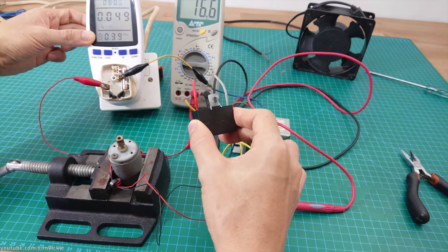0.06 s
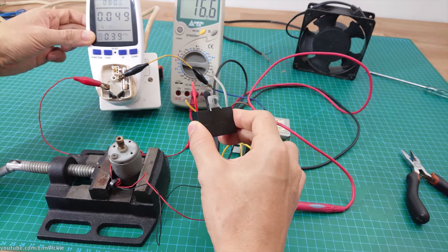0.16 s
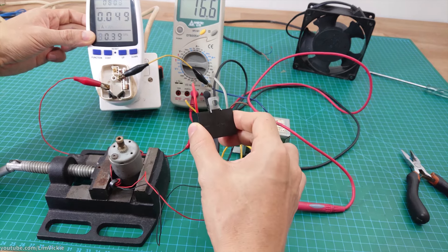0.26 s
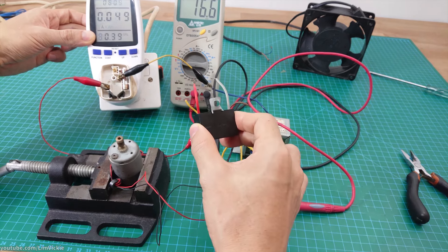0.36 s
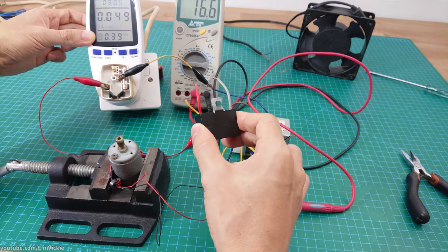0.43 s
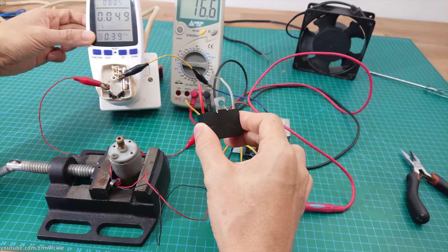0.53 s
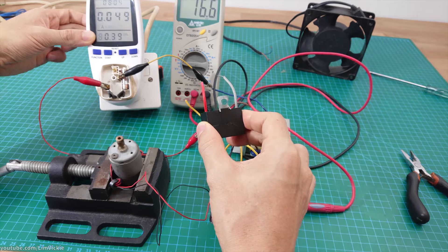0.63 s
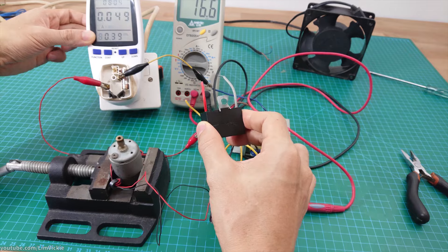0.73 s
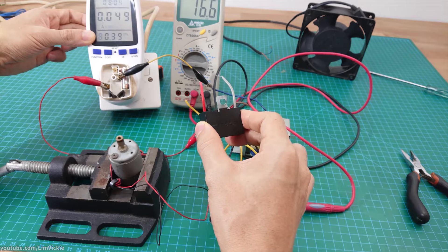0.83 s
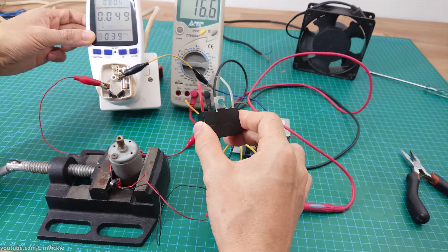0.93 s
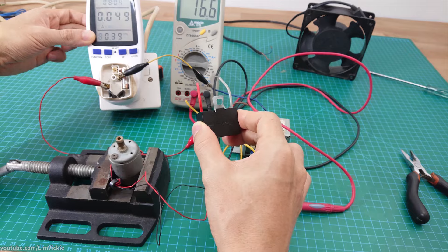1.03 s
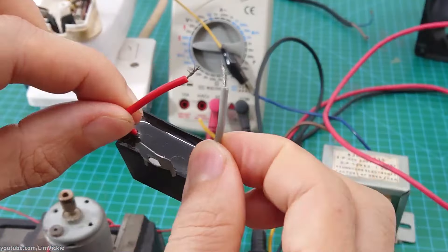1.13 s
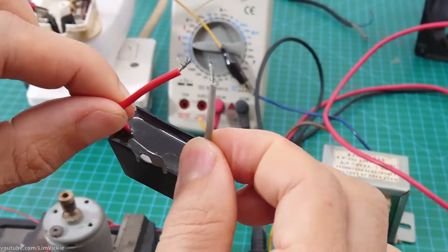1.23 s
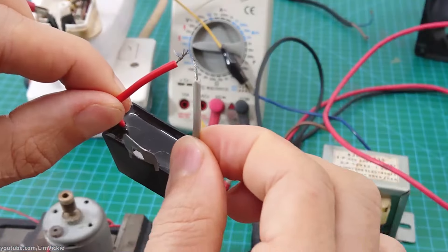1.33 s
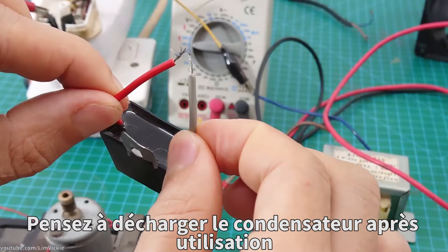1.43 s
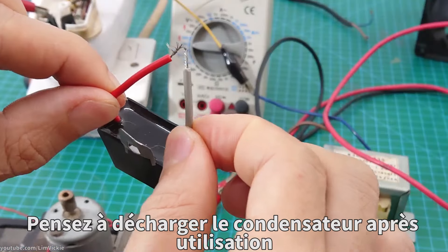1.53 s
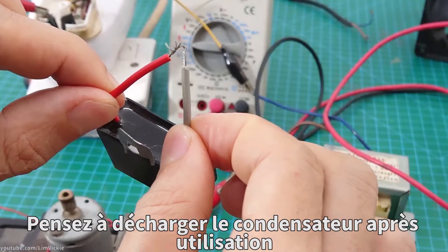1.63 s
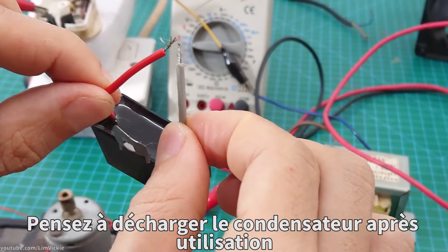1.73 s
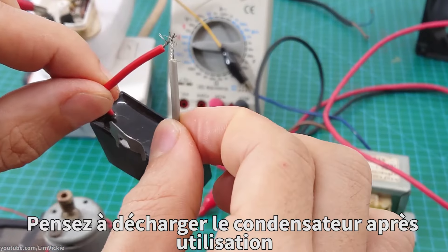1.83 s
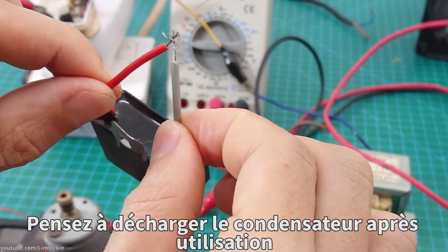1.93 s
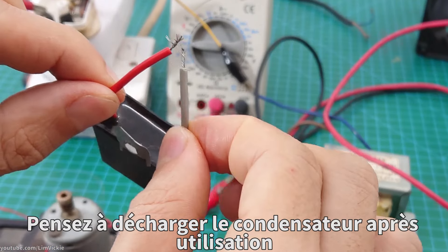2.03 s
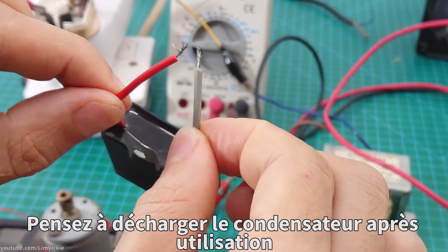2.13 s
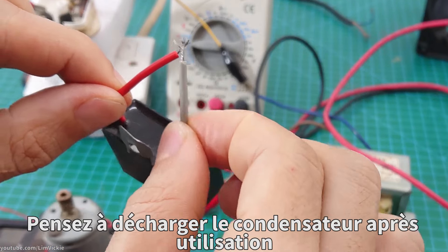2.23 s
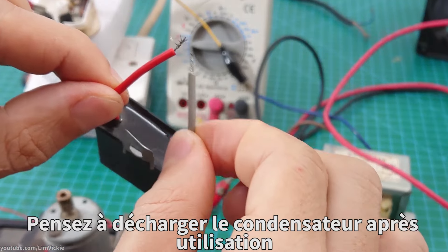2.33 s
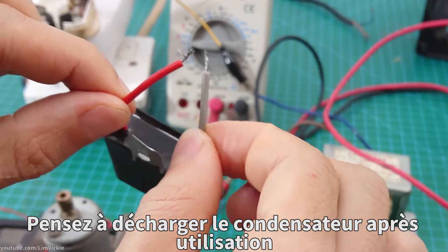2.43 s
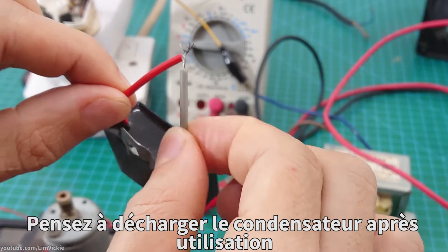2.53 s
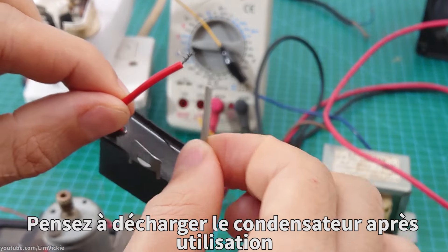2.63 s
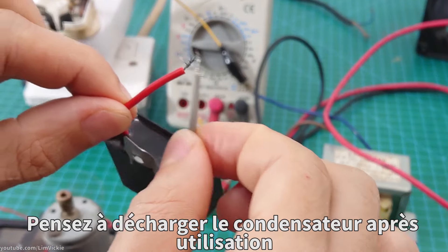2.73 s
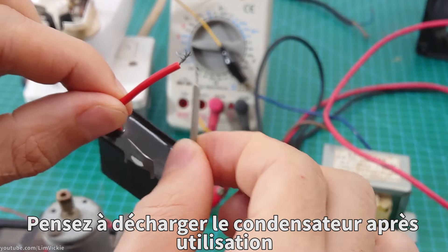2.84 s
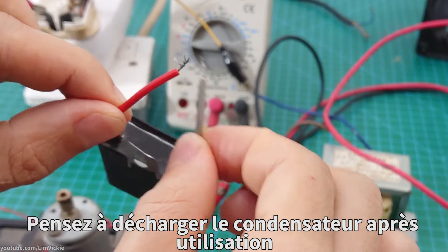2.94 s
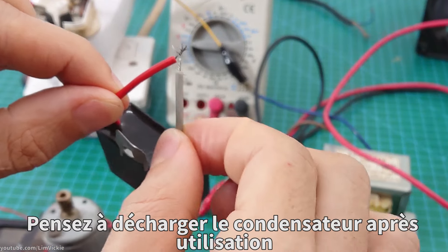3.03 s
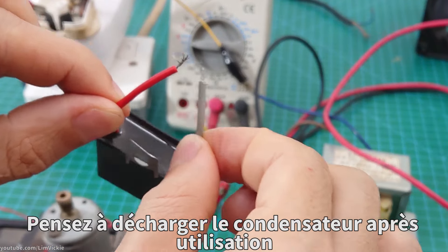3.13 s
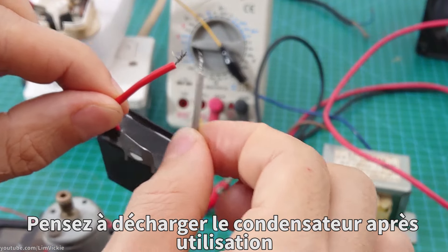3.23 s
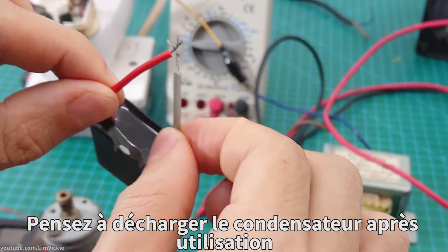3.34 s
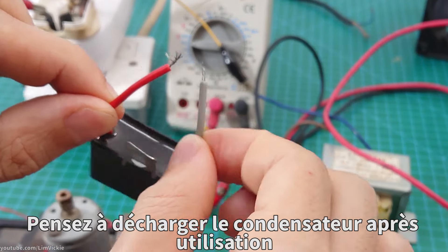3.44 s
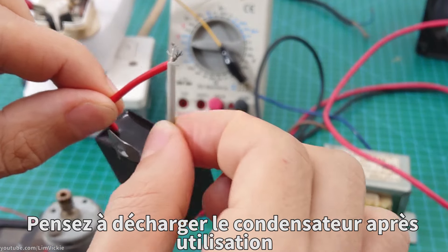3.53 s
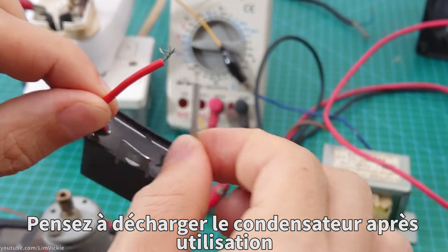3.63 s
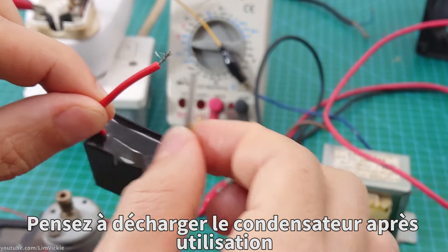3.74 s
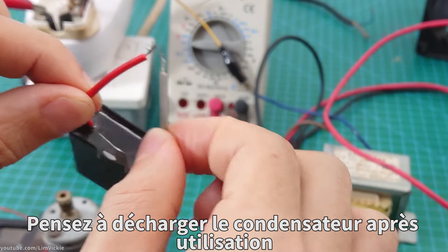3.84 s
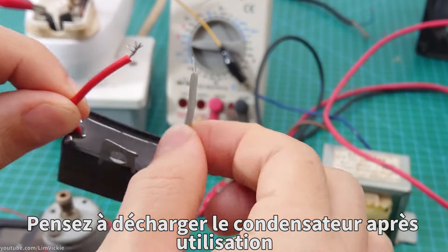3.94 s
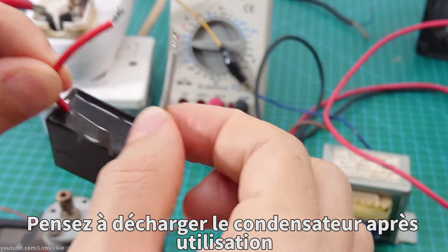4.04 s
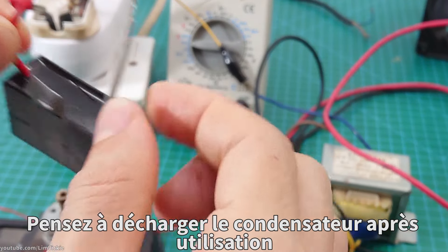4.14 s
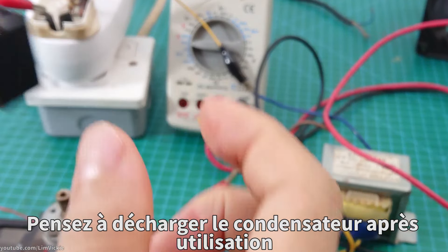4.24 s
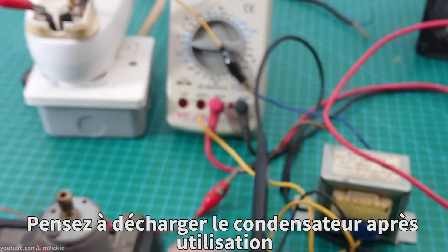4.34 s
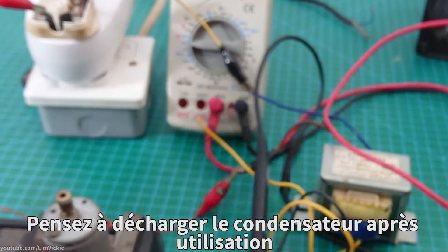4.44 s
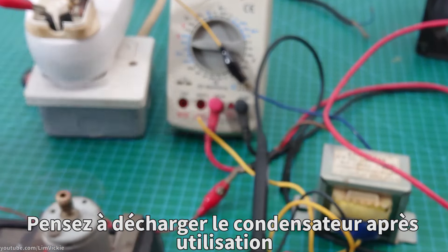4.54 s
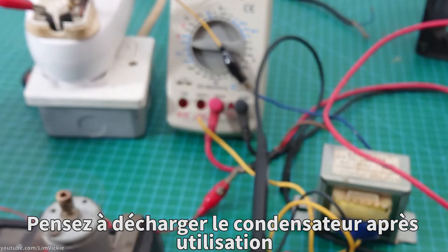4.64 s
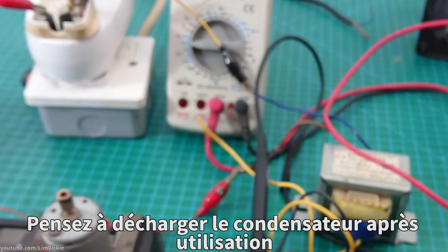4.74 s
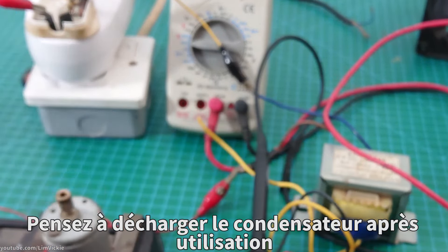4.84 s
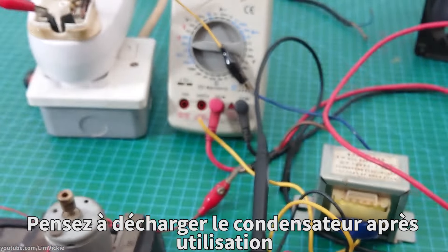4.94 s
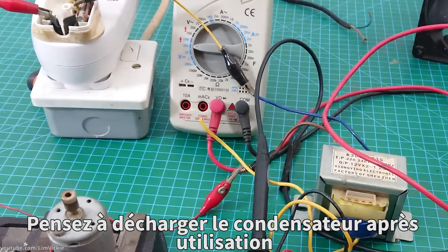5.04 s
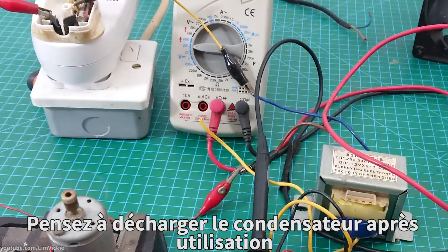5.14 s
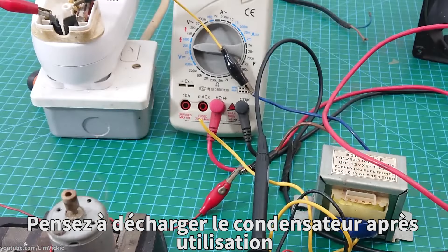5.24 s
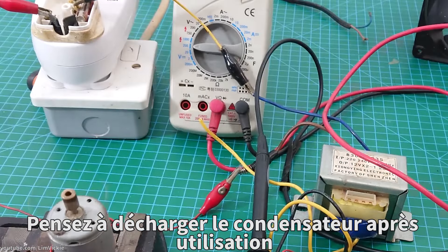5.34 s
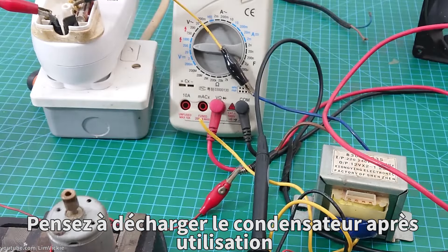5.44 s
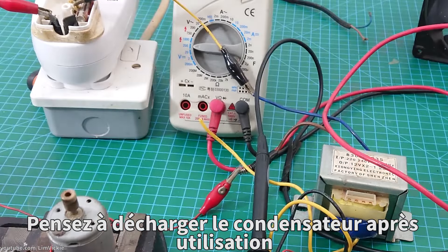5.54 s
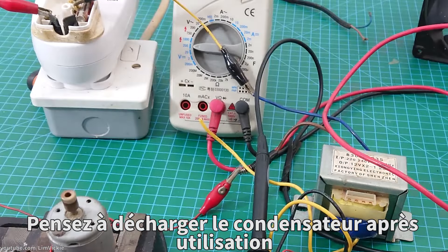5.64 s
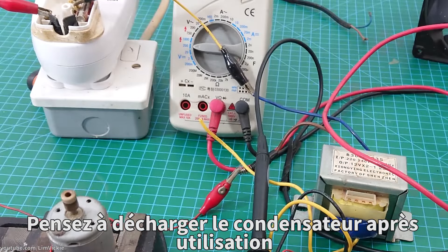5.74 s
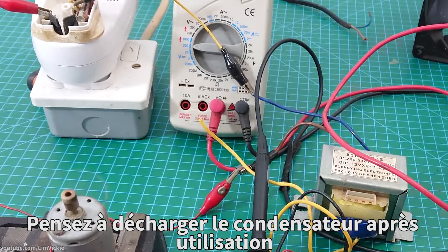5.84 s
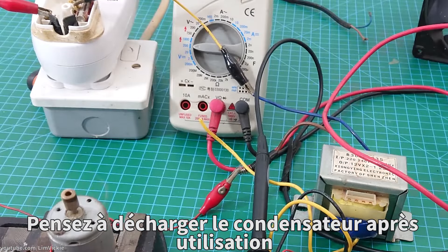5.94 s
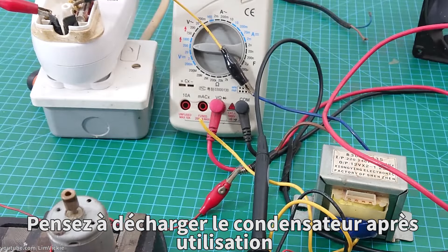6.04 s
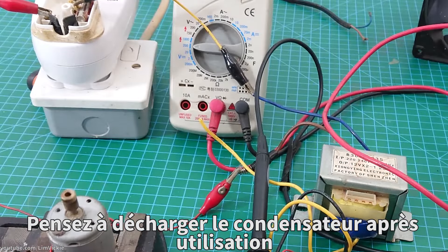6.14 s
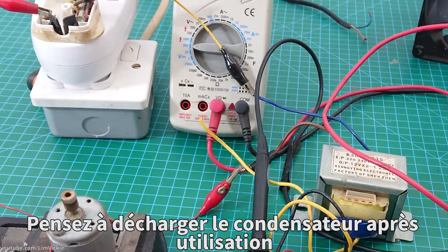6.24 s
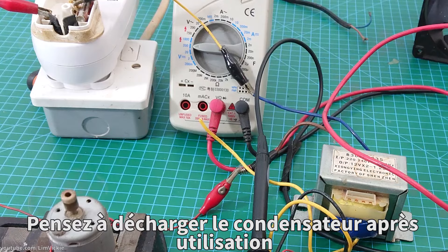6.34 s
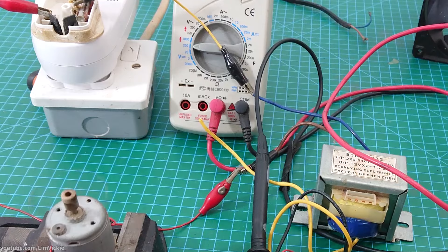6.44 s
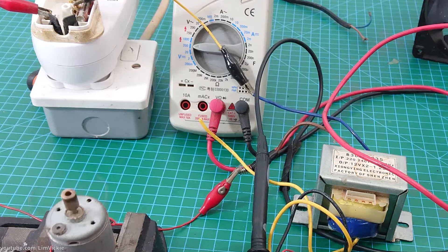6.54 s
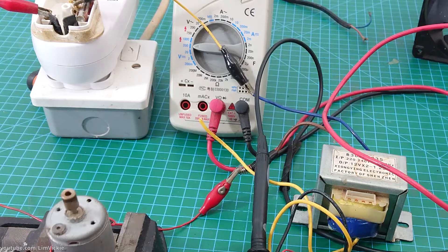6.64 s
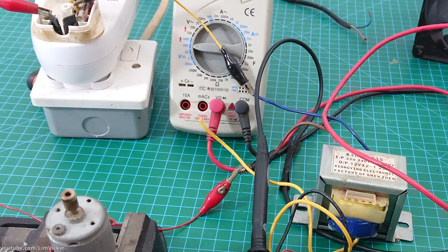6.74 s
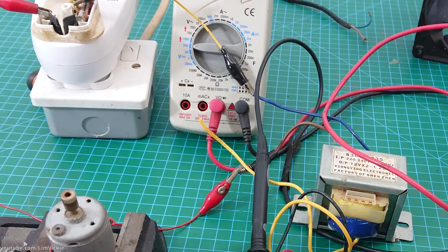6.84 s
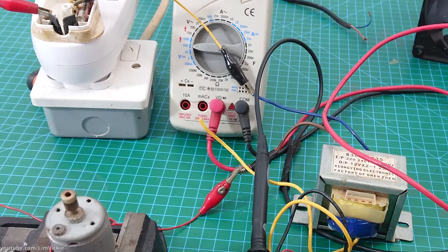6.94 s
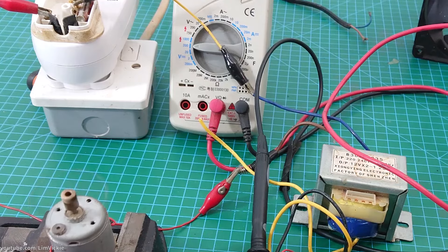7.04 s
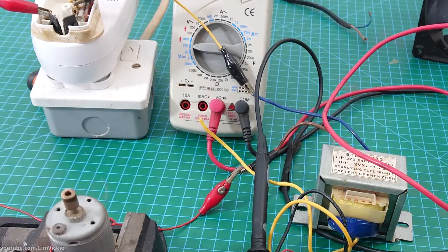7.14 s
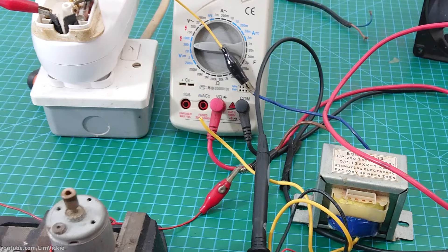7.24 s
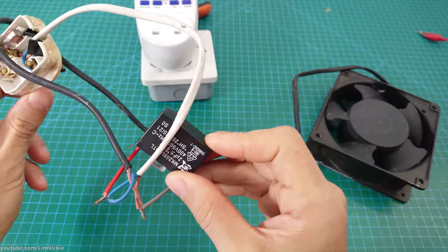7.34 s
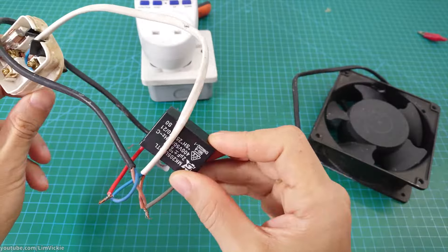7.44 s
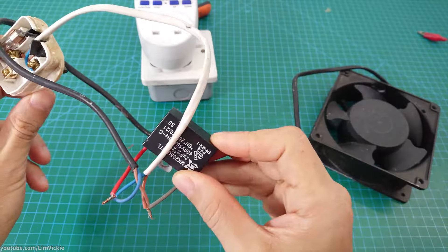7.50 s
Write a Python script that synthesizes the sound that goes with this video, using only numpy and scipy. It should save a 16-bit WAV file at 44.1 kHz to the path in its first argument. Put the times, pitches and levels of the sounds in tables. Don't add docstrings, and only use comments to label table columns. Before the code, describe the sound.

Indoors, a little motor buzzes unbroken, low drone mostly left with metallic ticking on top. About two seconds in, an explosive spark crack jolts the microphone and pushes the motor down for a moment while hissy reverberation fades. The buzz recovers and gets slightly brighter, with a distant double clatter and a faint high squeal behind it. It stops abruptly; after a blink of silence, soft room air and a thin bright brush of wires.

```python
import sys
import numpy as np
from scipy import signal
from scipy.fft import rfft, irfft
from scipy.io import wavfile

SR = 44100
rng = np.random.default_rng(int(sys.argv[2]) if len(sys.argv) > 2 else 0)


def dump(signal):
    limited = np.clip(np.atleast_2d(signal).T, -1, 1)
    pcm = np.round(limited * 32767).astype(np.int16)
    wavfile.write(sys.argv[1], SR, pcm)


def magnitude_from_level(level_db):
    exponent = np.asarray(level_db, float) / 20
    return 10 ** exponent


N = 333881


def at(s):
    return np.round(np.asarray(s) * SR).astype(int)


def ramp(start_s, length_s):
    return np.clip((np.arange(N) / SR - start_s) / length_s, 0, 1)


def drift(rate):
    knots = rng.standard_normal(400)
    return np.interp(np.arange(N) / SR * rate, np.arange(400), knots) * 1.45


def ring(clicks, hz, t60):
    r = magnitude_from_level(-60 / (t60 * SR))
    w = 2 * np.pi * hz / SR
    return signal.lfilter([0, np.sin(w)], [1, -2 * r * np.cos(w), r * r], clicks + 1e-18)


def coloured(rows, size):
    hz, *sides = np.transpose(rows)
    bins = np.log(np.fft.rfftfreq(size, 1 / SR) + 1)
    gains = [magnitude_from_level(np.interp(bins, np.log(hz), db, left=-130)) for db in sides]
    return irfft(rfft(rng.standard_normal((2, size))) * gains, size) * np.sqrt(SR / 2)


# [up to f/Hz, far level/dB, level behind the hands/dB, level once the hands are gone/dB]
MOTOR_REACH = [(1800, -6.5, -1, -0.5), (3300, 1.5, 1, 2), (5200, 1.5, 1, 1.5), (7000, 7.5, -0.5, 3.5),
               (20000, 6, 2, 3)]
CLOSER_S = 1.2
HANDS_LEAVE_S, CLEARING_S = 4.27, 1.7
ARM_SHADOW_DB = -1.5


def reach_db(hz):
    tops = [row[0] for row in MOTOR_REACH]
    _, far_db, shaded_db, clear_db = MOTOR_REACH[np.searchsorted(tops, hz)]
    clear = ramp(HANDS_LEAVE_S, CLEARING_S)
    arm_db = ARM_SHADOW_DB * np.sin(np.pi * clear) * (hz < tops[0])
    close_db = shaded_db + (clear_db - shaded_db) * clear + arm_db
    return np.where(np.arange(N) / SR < CLOSER_S, far_db, close_db)


TURNS_HZ = 41.625
# [t/s, lateness/turns]
MOTOR_LATE = [(0, .075), (1.195, 0.093), (1.2, .29), (2.65, .275), (4.4, .405), (5.5, 0.38), (7.3, .345)]
# [multiple, left level/dB, right level/dB]
MOTOR_DRONE = [(2, -53, -81), (3, -80, -79), (4, -51, -82), (5, -56, -83.5), (6, -63, -100), (7, -67, -72),
               (8, -57, -88), (9, -56, -91), (11, -65.5, -91), (12, -70, -78), (13, -64, -87),
               (14, -70.5, -86), (15, -71.5, -96), (16, -67, -98), (19, -76, -82), (20, -76, -77.5),
               (22, -70, -83), (33, -62.5, -72), (35, -63.5, -83.5), (36, -62.5, -84), (39, -80.5, -89),
               (40, -64.5, -99), (58, -72, -74)]
# [place/turns, f/Hz, t60/s, left peak level/dB, right peak level/dB]
MOTOR_CONTACTS = [(.52, 1091, 0.032, -39.5, -48.5), (.53, 3040, 0.0044, -42.5, -42),
                  (0.66, 5900, 0.016, -59.5, -57), (.53, 3700, 0.0045, -53, -55),
                  (.83, 1236, 0.029, -45.5, -62), (.82, 2690, 0.006, -44, -62),
                  (.12, 1063, 0.0074, -43, -51), (.55, 2040, 0.0097, -47, -65),
                  (0, 3800, 0.018, -46.5, -56), (0.033, 5800, 0.012, -48, -93),
                  (0.16, 8470, 0.0074, -54, -85), (0.022, 10150, 0.018, -60.5, -75.5),
                  (0, 12300, .008, -63, -66), (0.25, 12000, .004, -53, -65), (0.02, 15000, .006, -58, -68),
                  (.14, 4450, 0.0054, -43.5, -60.5), (0.073, 4240, 0.0057, -57, -52),
                  (0.053, 9200, 0.0055, -53, -74), (0.18, 11000, 0.0042, -58, -64.5)]


def motor(swell_db=1.5, wander_db=1.3, hit_db=1.1, jitter_s=6e-6, room_db=-11, room_t60=.2):
    t = np.arange(N) / SR
    turns = TURNS_HZ * t - np.interp(t, *np.transpose(MOTOR_LATE))
    drone, knocks = np.zeros((2, N)), np.zeros((2, N))
    for k, *db in MOTOR_DRONE:
        tone = np.sin(2 * np.pi * (np.round(k) * turns + rng.random()))
        drone += np.outer(magnitude_from_level(db), np.sqrt(2) * tone * magnitude_from_level(swell_db * drift(2.56)))
    for turn, hz, t60, left_db, right_db in MOTOR_CONTACTS:
        chance = rng.standard_normal((330, 2))
        s = np.interp(np.arange(330) + turn, np.maximum.accumulate(turns), t) + jitter_s * chance[:, 0]
        clicks = np.zeros(N)
        clicks[np.clip(at(s), 0, N - 1)] = magnitude_from_level(hit_db * chance[:, 1])
        rung = ring(clicks * magnitude_from_level(reach_db(hz) + wander_db * drift(1.54)), hz, t60)
        knocks += [magnitude_from_level(left_db) * rung, magnitude_from_level(right_db) * np.roll(rung, 8)]
    echo_t = t[:9000]
    echoes = rng.standard_normal((2, 9000)) * magnitude_from_level(-60 * echo_t / room_t60) * (echo_t > .002)
    echoes *= magnitude_from_level(room_db) / np.linalg.norm(echoes, axis=1, keepdims=True)
    return drone + knocks + signal.fftconvolve(knocks, echoes, axes=1)[:, :N]


# [f/Hz, left level/dB per Hz, right level/dB per Hz]
WORKSHOP_AIR = [(32.9, -94, -94), (55, -67, -78), (101, -80, -82.5), (171, -79.5, -88), (250, -81, -103),
                (408, -77.5, -102.5), (664, -85.5, -101.5), (1620, -87.5, -93.5), (4300, -99, -96.5),
                (6050, -95, -100), (6970, -103, -112), (7500, -106, -121), (8700, -101, -110),
                (15500, -102, -112)]
# [f/Hz, width/Hz, left level/dB]
ROOM_MODES = [(60, 8, -62), (96, 4.6, -61), (123, 8, -56.5), (241.7, 7, -59.5), (289, 8.8, -75)]


def workshop_air(patchy_db=0.7):
    out = coloured(WORKSHOP_AIR, N) * magnitude_from_level(patchy_db * drift(9))
    for hz, width_hz, db in ROOM_MODES:
        hum = ring(rng.standard_normal(N), hz, 3.0 / width_hz)
        out[0] += magnitude_from_level(db) * hum / hum.std()
    return out


# [t/s, left height, right height, edge f/Hz, ringing]
MIC_JOLTS = [
    (2.06460, .83, .022, 4000, 1),
    (2.63452, -.138, 0, 2100, .72),
    (1.866, 0, .012, 150, .9),
    (1.8845, 0, -.013, 150, .9),
]
# [f/Hz, Q]
RUMBLE_FILTER = [(54, 1.66), (55.1, 1.04), (31, 1.18)]


def jolts():
    out = np.zeros((2, N))
    for s, left, right, edge_hz, ringing in MIC_JOLTS:
        step = signal.lfilter(*signal.bessel(2, edge_hz, fs=SR, norm="mag"), np.ones(9000))
        for hz, q in RUMBLE_FILTER:
            w = 2 * np.pi * hz
            step = signal.lfilter(*signal.bilinear([1, 0, 0], [1, w / (q * ringing), w * w], SR), step)
        out[:, at(s) + np.arange(9000)] += np.outer([left, right], step)
    return out


# [t/s, left peak level/dB, right peak level/dB]
SPARK_CLICKS = [(2.06452, -7, -40), (2.06457, -40, -11), (2.06485, -40, -15), (2.06548, -17, -25),
                (2.06582, -40, -23), (2.06703, -36, -22), (2.0687, -32, -24), (2.0710, -22, -23),
                (2.0723, -22, -26)]
CRACK_S = SPARK_CLICKS[0][0]
# [f/Hz, t60/s, left level/dB, right level/dB]
MIC_RESONANCES = [(6100, .0018, -11, -5), (11500, .0014, -12, -10), (14600, .0016, -4, -9),
                  (3300, .001, -9, -30), (4600, .0015, -14, -12)]


def spark(smear_db=-28, smear_t60=.0035):
    out = np.zeros((2, N))
    s, *db = np.transpose(SPARK_CLICKS)
    for hz, t60, *mode_db in MIC_RESONANCES:
        clicks = np.zeros((2, N))
        peak_db = np.array(db) + np.c_[mode_db] + rng.standard_normal((len(s), 2)).T
        clicks[:, at(s)] = magnitude_from_level(peak_db) * np.c_[[-1, 1]]
        clicks[0, at(s[0] + .002):] *= min(hz / 12000, 1) ** 2
        out += ring(clicks, hz, t60)
    out[1] = 1.25 * signal.lfilter(*signal.butter(2, 3200, "high", fs=SR), out[1])
    ahead = np.arange(200)
    smear = np.diff(rng.standard_normal((2, 201)))
    out[:, at(s[0]) - ahead] += smear * magnitude_from_level(smear_db - 60 * ahead / SR / smear_t60)
    return out


# [f/Hz, left level/dB per Hz, right level/dB per Hz, t60/s]
SPARK_TAIL = [(1200, -74.5, -101, 0.22), (2200, -80.5, -76, 0.56), (3600, -74.5, -77, 0.57),
              (5500, -76, -74.5, 0.53), (7000, -77, -87, 0.65), (7800, -82.5, -78, 0.45),
              (9300, -65.5, -80, 0.45), (11800, -69, -70, 0.44), (14000, -63, -73, 0.39),
              (15500, -67, -90, 0.53)]


def spark_tail(size=30000, early_db=3, early_t60=.07, late_db=-32):
    out, t, hz = np.zeros((2, N)), np.arange(size) / SR, np.fft.rfftfreq(size, 1 / SR)
    edges = [700] + [row[0] for row in SPARK_TAIL] + [17000]
    onset = np.clip(t / np.c_[[.007, .002]], 0, 1) ** np.c_[[2, 1]]
    early = magnitude_from_level(early_db - 60 * t / early_t60)
    for k, (_, left_db, right_db, t60) in enumerate(SPARK_TAIL):
        share = np.interp(hz, edges[k:k + 3], [0, 1, 0])
        gains = np.outer(magnitude_from_level([left_db, right_db]), np.sqrt(share * SR / 2))
        band = irfft(rfft(rng.standard_normal((2, size))) * gains, size)
        decay = magnitude_from_level(-60 * t / t60) + early + magnitude_from_level(late_db - 25 * t / t60)
        out[:, at(CRACK_S) + np.arange(size)] += band * onset * decay
    return out


LOOK_AHEAD_S, AHEAD_DB = 0.0081, -27.5
DUCK_DB, DUCK_ATTACK_S, DUCK_HOLD_S, RELEASE_S = -16.5, 0.013, 0.088, 0.08


def gain_control_db():
    ahead = ramp(CRACK_S - LOOK_AHEAD_S - .002, .004) - ramp(CRACK_S - .002, .0015)
    after = np.clip(np.arange(N) / SR - CRACK_S - DUCK_HOLD_S, 0, None)
    duck = ramp(CRACK_S - .004, DUCK_ATTACK_S) * np.exp(-after / RELEASE_S)
    return AHEAD_DB * ahead + DUCK_DB * duck


# [t/s, left peak level/dB, f/Hz]
CLATTER_KNOCKS = [
    (4.988, -34, 2300),
    (4.989, -37, 600),
    (4.9965, -33, 1050),
    (5.1112, -26.5, 3000),
    (5.1116, -34, 1100),
    (5.113, -35, 550),
    (5.116, -34, 2000),
]


def clatter(right_db=-6, tail_db=-21):
    out, t = np.zeros((2, N)), np.arange(4000) / SR
    for s, db, hz in CLATTER_KNOCKS:
        wake = rng.standard_normal((2, 4000)) * magnitude_from_level(tail_db - 60 * t / 0.15)
        hit = np.sin(2 * np.pi * hz * t) * magnitude_from_level(-60 * t * hz / 8)
        dull = signal.butter(4, [hz / 5, min(3 * hz, 5200)], "band", fs=SR, output="sos")
        knock = signal.sosfilt(dull, hit + 4 * wake)
        out[:, at(s) + np.arange(4000)] += knock * magnitude_from_level(db + np.c_[[0, right_db]])
    return out


# [pitch ratio, level/dB]
SQUEAK_LINES = [(.92, -4), (1.001, 5), (1.065, 2), (1.17, -4), (1.29, -6)]
SQUEAK_S, SQUEAK_RISE_S, SQUEAK_HOLD_S, SQUEAK_FALL_S = 5.6, .06, .23, .04
SQUEAK_HZ, SLIDE_HZ, SAG_HZ_PER_S, WOBBLE_HZ = 11420, 1050, 3200, 30
SQUEAK_DB, FADE_DB_PER_S, EDGE_DB = -72, 8, -12
PUSH_S, PUSH_WIDTH_S, PUSH_HZ = 5.82, .03, 300


def squeak(right_db=-8):
    t = np.arange(N) / SR
    rise = ramp(SQUEAK_S, SQUEAK_RISE_S)
    held = SQUEAK_HOLD_S * ramp(SQUEAK_S + SQUEAK_RISE_S, SQUEAK_HOLD_S)
    fall = ramp(SQUEAK_S + SQUEAK_RISE_S + SQUEAK_HOLD_S, SQUEAK_FALL_S)
    hz = SQUEAK_HZ - SLIDE_HZ * (1 - rise) - SAG_HZ_PER_S * (held + SQUEAK_FALL_S * fall)
    hz += PUSH_HZ * np.exp(-((t - PUSH_S) / PUSH_WIDTH_S) ** 2) + WOBBLE_HZ * drift(45)
    db = SQUEAK_DB + EDGE_DB * (1 - rise + fall) - FADE_DB_PER_S * held
    angle = 2 * np.pi * np.cumsum(hz) / SR
    lines = np.zeros(N)
    for ratio, line_db in SQUEAK_LINES:
        lines += magnitude_from_level(line_db - 1 + 2.5 * drift(35)) * np.sin(ratio * angle)
    return np.outer(magnitude_from_level([3, right_db]), lines * magnitude_from_level(db) * (rise > 0) * (fall < 1))


SILENCE_S = (7.2703, 7.3412)
# [f/Hz, left level/dB per Hz, right level/dB per Hz]
QUIET_AIR = [(29.5, -82, -100), (54, -60, -89), (100, -82.5, -88), (263, -76, -97), (497, -81.5, -96),
             (1190, -85, -96), (2170, -91, -95), (3470, -102, -103), (5440, -106, -107), (7600, -115, -120),
             (8800, -109, -115), (15500, -109, -115)]


def quiet_air():
    return coloured(QUIET_AIR, N) * (np.arange(N) / SR > SILENCE_S[1])


RUSTLE_S, RUSTLE_DB, RUSTLE_T60_S, RUSTLE_LOW_HZ = 7.364, -62, .9, 8300


def rustle():
    since = np.arange(N) / SR - RUSTLE_S
    bright = signal.butter(4, RUSTLE_LOW_HZ, "high", fs=SR, output="sos")
    hiss = signal.sosfilt(bright, rng.standard_normal((2, N)))
    db = RUSTLE_DB + np.c_[[0, -6]] - 60 * np.clip(since, 0, 1) / RUSTLE_T60_S
    return hiss * magnitude_from_level(db) * ramp(RUSTLE_S, .006)


def scene(treble_duck=0.62, top_hz=15820):
    t, gain_db = np.arange(N) / SR, gain_control_db()
    workshop = (motor() + workshop_air() + clatter() + squeak()) * magnitude_from_level(gain_db)
    residue = magnitude_from_level(-26 - 2200 * np.clip(t - SILENCE_S[0], 0, 1))
    background = workshop * np.where(t < SILENCE_S[0], 1, residue) + quiet_air()
    background = background + spark_tail() * magnitude_from_level(treble_duck * gain_db) + rustle()
    top = signal.ellip(10, .1, 45, top_hz, fs=SR, output="sos")
    return signal.sosfiltfilt(top, background) + spark() + jolts()


def band_limit(x):
    return signal.sosfilt(signal.butter(12, 16960, fs=SR, output="sos"), x)


def record(dry):
    return band_limit(dry)


dry = scene()
out = record(dry)
dump(out)
```